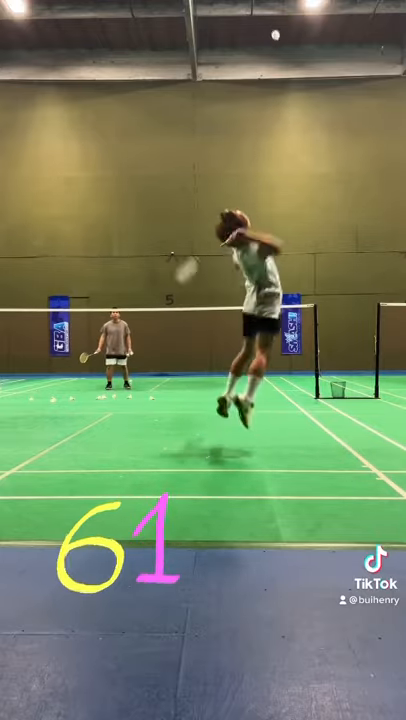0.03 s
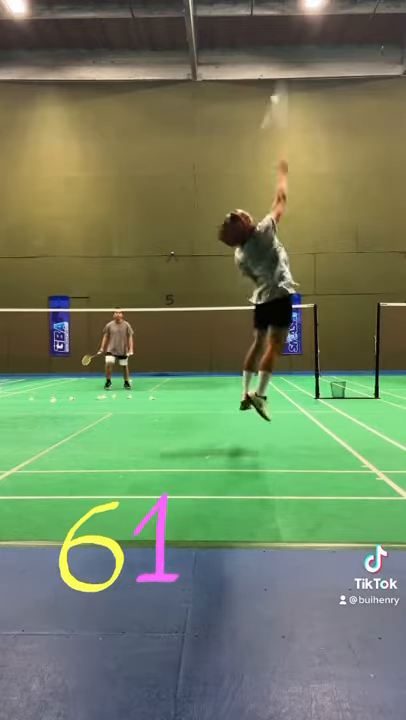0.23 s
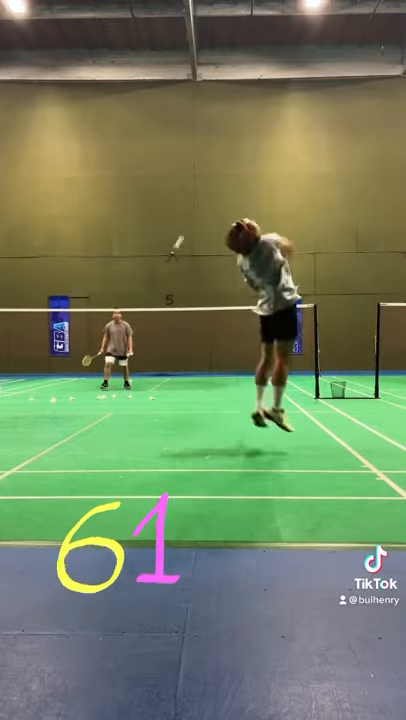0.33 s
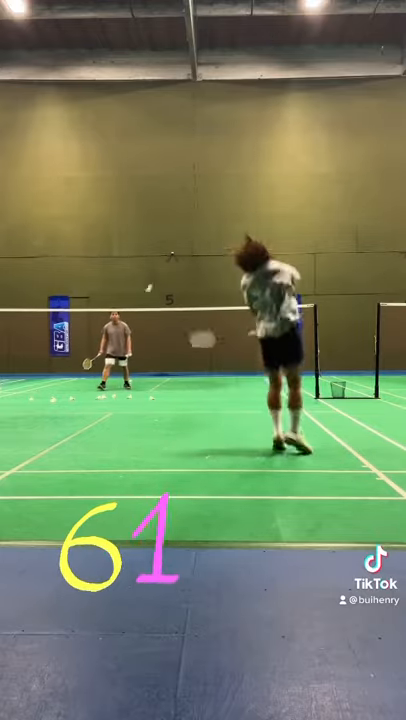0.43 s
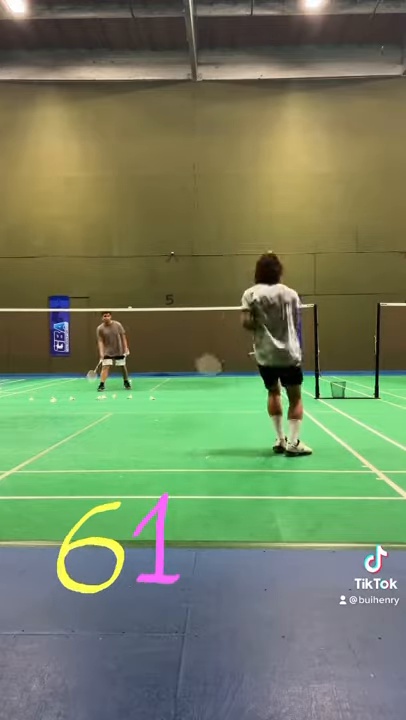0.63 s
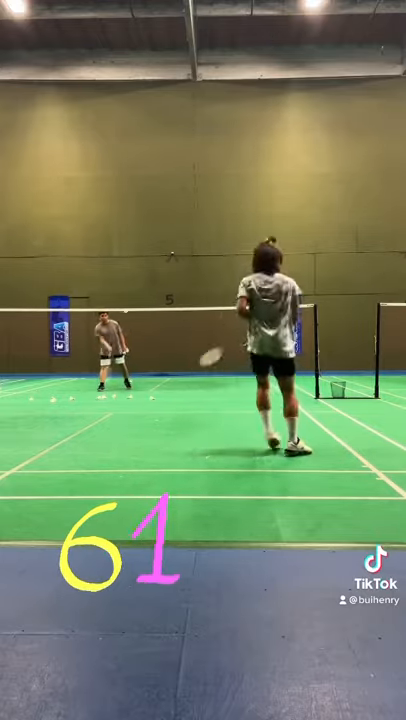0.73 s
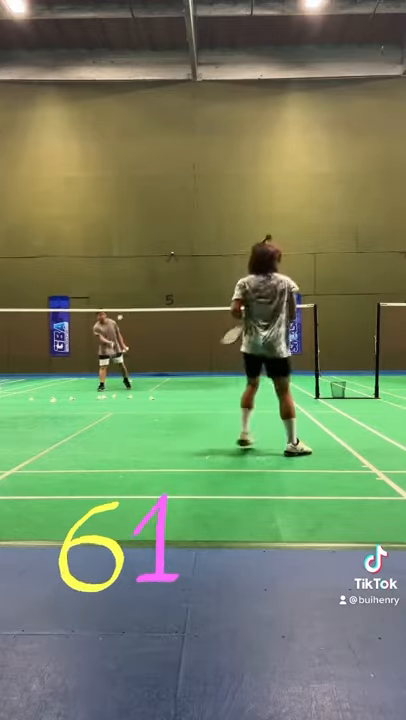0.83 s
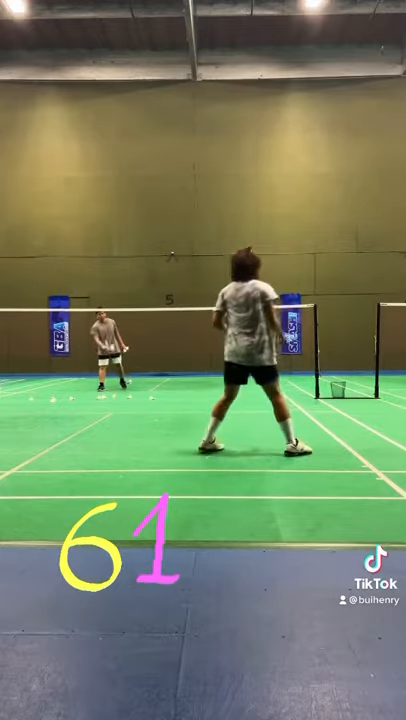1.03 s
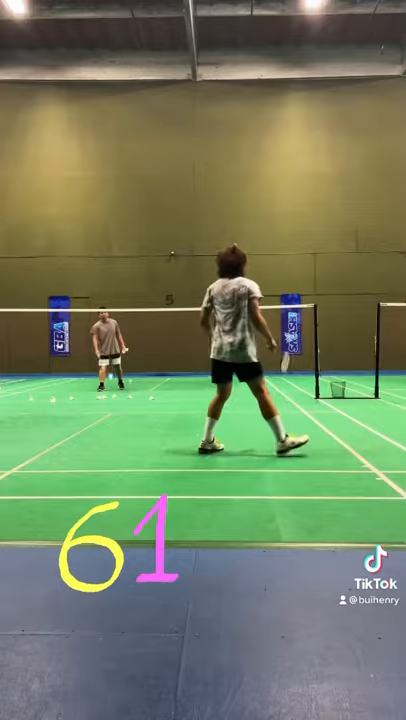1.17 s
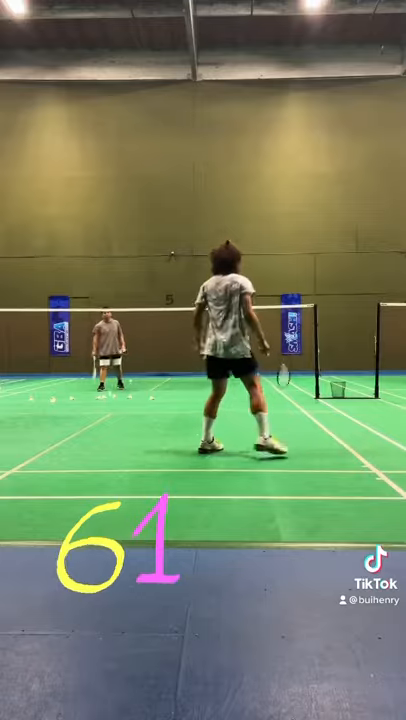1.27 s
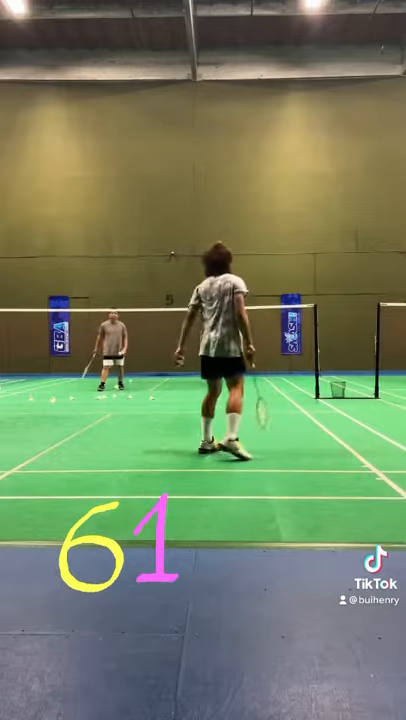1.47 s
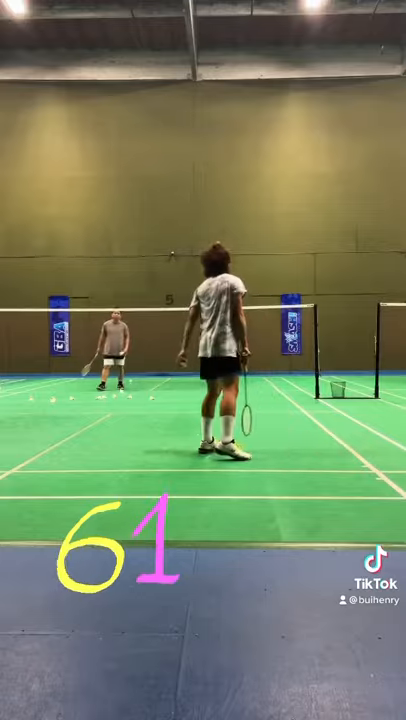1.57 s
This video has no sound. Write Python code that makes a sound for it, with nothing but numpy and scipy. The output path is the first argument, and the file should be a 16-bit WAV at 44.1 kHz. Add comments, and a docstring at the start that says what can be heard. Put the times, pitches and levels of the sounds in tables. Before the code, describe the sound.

A badminton racket swishes and cracks against a shuttlecock, echoing through a large sports hall. The player lands with shoe clicks and deep floor thuds, then shuffles lightly. A low ventilation rumble lies underneath, heard from behind the court.

```python
"""A racket swishes over a low ventilation rumble, then cracks against a shuttlecock: a badminton jump smash.
The large sports hall answers with slap echoes and a long tail while the follow-through hums through the air.
The player lands with sole clicks and deep thuds of the sprung floor, then shuffles and steps.
A small stereo microphone listens from behind the court."""
import sys
import numpy as np
from scipy import signal
from scipy.fft import rfft, irfft
from scipy.io import wavfile

SR = 44100
rng = np.random.default_rng(int(sys.argv[2]) if len(sys.argv) > 2 else 0)


def wrap_up_sound(samples):
    """Save the sound to the file named by the first command line argument, as 16-bit audio."""
    columns = np.atleast_2d(samples).T
    # keep every value between -1 and 1, then stretch to whole-number steps
    tamed = np.clip(columns, -1, 1)
    steps = np.round(tamed * 32767).astype(np.int16)
    wavfile.write(sys.argv[1], SR, steps)


N = 70560
T = np.arange(N) / SR
HZ = np.maximum(np.fft.rfftfreq(2 * N, 1 / SR), 1)


def from_db(db):
    """Decibels to gain."""
    return 10 ** (np.asarray(db) / 20)


def at_hz(points, hz, column=1):
    """Read a column of a table on a log-frequency axis."""
    points = np.array(points)
    return np.interp(np.log(hz), np.log(points[:, 0]), points[:, column])


def filtered(x, response):
    """Apply a frequency response."""
    return irfft(rfft(x, 2 * N) * response)[..., :N]


def convolve(x, response):
    """Pass a sound through an impulse response."""
    return filtered(x, rfft(response, 2 * N))


def low_cut(x, hz, order=2):
    """Small or slow motions radiate little bass."""
    return signal.sosfilt(signal.butter(order, hz, "high", fs=SR, output="sos"), x)


def noise(spectrum):
    """Coloured noise of rms 1; the spectrum sets only its shape."""
    x = filtered(rng.standard_normal(N), from_db(at_hz(spectrum, HZ)))
    return x / x.std()


def diffuse(make):
    """Two draws of a noise, as mid and side, give a partly alike left and right."""
    # likeness of diffuse sound in the two channels: freq_hz, likeness (0-1)
    likeness = [(80, 1), (200, 0.95), (520, 0.12), (1200, 0.3), (1800, 0.82), (3000, 0), (4800, 0.63),
                (6000, 0.75), (7600, 1), (9000, 1), (11000, 1)]
    alike = np.clip(at_hz(likeness, HZ), 0, .999)
    mid = filtered(make(), np.sqrt((1 + alike) / 2))
    side = filtered(make(), np.sqrt((1 - alike) / 2))
    return np.array([mid + side, mid - side])


def envelope(start_s, rise_s, hold_s, t60_s):
    """Curved attack, hold, exponential release."""
    t = T - start_s
    attack = np.clip(t / rise_s, 0, 1) ** 2
    return attack * from_db(-60 * np.maximum(t - rise_s - hold_s, 0) / t60_s)


def ring(start_s, modes, pitch=1, spread_s=0):
    """Struck modes: dying sines, set off at random moments within the spread."""
    out = np.zeros(N)
    for hz, db, t60 in modes:
        t = T - start_s - spread_s * rng.random()
        live = (t > 0) & (t < 2 * t60)
        out[live] += from_db(db - 60 * t[live] / t60) * np.sin(2 * np.pi * hz * pitch * t[live])
    return out


def ventilation():
    """The ventilation lays a steady, diffuse rumble under everything."""
    # colour of the rumble: freq_hz, level_db
    colour = [(25, -27), (45, -16), (75, 2), (130, -7.5), (230, -14), (340, -11), (600, -22.5),
              (1200, -32.5), (3000, -40.5), (6000, -50.5), (11000, -60.5), (14000, -84)]
    return from_db(-44.5) * diffuse(lambda: noise(colour))


def swish():
    """Air rushes through the strings as the racket gathers speed."""
    # colour of the rushing air: freq_hz, level_db
    colour = [(120, -16), (280, 3), (420, 10), (700, 1), (1100, 9.5), (1500, -2.5), (4000, -8), (6500, 4),
              (8500, 1), (10500, 5), (13000, -21)]
    return from_db(-37) * noise(colour) * envelope(start_s=.14, rise_s=.072, hold_s=0, t60_s=.33)


def smash(hit_s=.2102):
    """Three layers: cork and feathers crack on the strings, the racket pings, its head pops."""
    # colour of the crack: freq_hz, level_db
    colour = [(60, -15), (200, -30), (450, -14), (750, -1.5), (1100, 9.5), (1450, -11), (2100, -0.5),
              (3700, -4.5), (4800, -4), (6200, -2.5), (8000, -1), (10500, 2), (12000, -11.5),
              (14000, -23.5)]
    # modes of frame and strings: pitch_hz, level_db, t60_s
    racket_modes = [(481, -27, 0.061), (686, -18, 0.021), (790, -17.5, 0.028), (1140, -37, 0.11),
                    (1278, -28, 0.06), (1645, -25.5, 0.068), (1864, -36.5, 0.12), (2040, -19, 0.018),
                    (2326, -34.5, 0.072), (2664, -39.5, 0.14), (3214, -24.5, 0.037), (3713, -32.5, 0.055),
                    (5710, -21.5, 0.015), (6390, -20, 0.024), (6770, -18.5, 0.012)]
    pop_hz, pop_db, pop_t60_s = 328, -15, .044
    crack = from_db(-21.5) * noise(colour) * envelope(hit_s, rise_s=.00019, hold_s=.0066, t60_s=.018)
    # the modes are set off while the shuttlecock is on the strings
    ping = ring(hit_s + .000522, racket_modes, spread_s=.003)
    pop = -ring(hit_s + .004494, [(pop_hz, pop_db, pop_t60_s)])
    return low_cut(np.array([crack, ping, pop]), hz=204)


def hall(x, predelay_s=.011, build_s=.027):
    """A diffuse tail builds up and dies away, the treble first; a few resonances linger."""
    # colour and decay of the reverb: freq_hz, level_db, t60_s
    reverb = [(59, 12, 1.97), (156, 13, 2.6), (316, 4.5, 7.34), (566, 11, 5.53), (1160, 9, 3.88),
              (1410, 6.5, 4.5), (1840, 7.5, 3.6), (2160, 7.5, 2.93), (3930, 4.5, 2.84), (6160, 0.5, 1.67),
              (10300, 6.5, 0.79), (12000, 8.5, 0.47)]
    # resonances of the hall: pitch_hz, level_db, t60_s
    hall_modes = [(604.6, -62.5, 2.2), (1162, -61.5, 1.9), (1616, -60, 1.4), (1837, -60, 4.8),
                  (2236, -67, 2.2), (2420, -61.5, 2.2)]
    white = rfft(diffuse(lambda: rng.standard_normal(N)), 2 * N) / np.sqrt(SR)
    centres_hz = np.geomspace(60, 12500, 24)
    tail = ring(predelay_s, hall_modes)
    for hz, pick in zip(centres_hz, np.eye(len(centres_hz))):
        band = irfft(white * np.interp(np.log(HZ), np.log(centres_hz), pick))[:, :N]
        decay = envelope(predelay_s, rise_s=.00048, hold_s=0, t60_s=at_hz(reverb, hz, column=2))
        tail = tail + band * from_db(at_hz(reverb, hz)) * decay
    return convolve(x, tail * (1 - np.exp(-T / build_s)))


def follow_through():
    """Eddies shed by the slowing racket shaft give a falling, breathy hum."""
    start_s, start_hz, fall_hz_per_s, waver_hz = .24, 485, 850, 25
    pitch_hz = np.maximum(start_hz - fall_hz_per_s * (T - start_s), start_hz / 2)
    waver = filtered(rng.standard_normal(N), 1 / (1 + (HZ / waver_hz) ** 2))
    tone = (1 + .5 * waver / waver.std()) * np.sin(2 * np.pi * np.cumsum(pitch_hz) / SR)
    return from_db(-41) * tone * envelope(start_s, rise_s=.015, hold_s=.079, t60_s=.57)


def slap_echoes(x):
    """Walls and roof return smeared copies, each dulled by its surface."""
    # reflections: delay_s, level_db, smear_s, cutoff_hz
    echoes = [(0.032, -14, .002, 14000), (.079, -12, .003, 13000), (.089, -9, .007, 2300),
              (.113, -11.5, 0.0059, 5000), (.139, -8, .006, 1300)]
    response = 0
    for delay_s, db, smear_s, cutoff_hz in echoes:
        scatter = rng.standard_normal(N) * (T > delay_s) * np.exp(-abs(T - delay_s) / smear_s)
        scatter = scatter / np.linalg.norm(scatter) + 1e-18
        dull = signal.butter(2, cutoff_hz, fs=SR, output="sos")
        response += from_db(db) * signal.sosfilt(dull, scatter)
    return convolve(x, response)


def sole_clicks():
    """Soles snap and knock on the mat three times; a faint, brighter slap echo follows the last."""
    # three sole clicks, then the echo: start_s, level_db, snap_db, pitch_ratio
    cues = [(0.3876, -16, -7, 1.07), (0.407, -18, 2.5, .95), (1.2436, -17.5, -15, 0.956),
            (1.2755, -34.5, -13, 2.03)]
    # modes of the sole: pitch_hz, level_db, t60_s
    sole_modes = [(642, -12, 0.049), (1070, -9.5, 0.027), (1390, -4.5, .018), (1657, -16.5, 0.038),
                  (3680, -21, 0.023), (4870, -25, 0.013)]
    # colour of the snap: freq_hz, level_db
    colour = [(500, 11.5), (2000, 2.5), (3300, -9.5), (4600, 1.5), (6200, 3), (8000, -13), (10500, -0.5),
              (12000, -16), (13500, -38.5)]
    snap_noise = noise(colour)
    clicks = 0
    for start_s, db, snap_db, pitch in cues:
        knock = ring(start_s, sole_modes, pitch, spread_s=.00051)
        snap = snap_noise * envelope(start_s, rise_s=.0002, hold_s=.00025, t60_s=.007)
        clicks += from_db(db) * (knock + from_db(snap_db) * snap)
    return low_cut(clicks, hz=284)


def floor_thuds():
    """The player's weight sets the floor booming; a longer contact is duller."""
    # footfalls: start_s, level_db, contact_s
    footfalls = [(0.393, -23.5, 0.00088), (0.4266, -14, 0.0031), (0.4457, -9, .0047),
                 (0.4603, -15.5, 0.0055), (0.5059, -13.5, 0.01074), (0.5566, -18.5, 0.0063),
                 (0.6652, -15, 0.0093), (0.7049, -15.5, 0.011), (0.8999, -30.5, 0.0039),
                 (1.0104, -29.5, 0.0036), (1.276, -33.5, 0.0021), (1.3382, -37, 0.0054)]
    # modes of the sprung floor: pitch_hz, level_db, t60_s
    floor_modes = [(63.9, -15.5, 0.52), (86.8, -10.5, 0.21), (109.7, -11.5, 0.21), (141.7, -5.5, 0.15),
                   (178.5, -1.5, 0.25), (227.8, 1.5, 0.1), (275.9, -2.5, 0.16)]
    boom = 0
    for start_s, db, contact_s in footfalls:
        push = np.sin(np.pi * np.clip(T / contact_s, 0, 1)) ** 2
        boom += from_db(db) * convolve(ring(start_s, floor_modes), push / push.sum())
    return low_cut(boom, hz=60.5, order=6)


def scuffs():
    """Soles slide on the mat with a rub and a hiss."""
    # slides: start_s, hold_s, level_db, hiss_db
    slides = [(0.422, 0.026, -34.5, -20), (0.893, 0.048, -50, -3.5), (1.273, 0.023, -43, -7.5),
              (1.325, 0.085, -52, -4.5)]
    # body of a scuff: freq_hz, level_db
    rub_colour = [(150, -22), (350, 12.5), (850, 0.5), (1600, -3.5), (2700, -4), (5000, -20), (10000, -52)]
    # top end of a scuff: freq_hz, level_db
    hiss_colour = [(2000, 3.5), (4500, 1.5), (6800, 4), (8500, 3), (10500, 4), (12500, -22.5)]
    rub, hiss = noise(rub_colour), noise(hiss_colour)
    shuffle = 0
    for start_s, hold_s, db, hiss_db in slides:
        stroke = envelope(start_s, rise_s=.0076, hold_s=hold_s, t60_s=.11)
        shuffle += from_db(db) * (rub + from_db(hiss_db) * hiss) * stroke
    return shuffle


def squeak(peak_s=.946, pitch_hz=2430, width_s=.007):
    """A sole grips with a tiny squeak."""
    return from_db(-44) * np.sin(2 * np.pi * pitch_hz * T) * np.exp(-((T - peak_s) / width_s) ** 2)


def scene():
    """Racket and footwork, their echoes and reverb, over the ventilation."""
    crack, ping, pop = smash()
    clicks = sole_clicks()
    # reverb sends: sound, send_db
    sends = [(swish(), 9), (crack, 3), (ping, -4), (pop, -1),
             (clicks, -9.5), (floor_thuds(), -6.5), (scuffs(), 2.5)]
    direct = sum(sound for sound, _ in sends) + follow_through() + squeak()
    # sounds made at floor level reach the walls more weakly
    slaps = slap_echoes(crack + ping + from_db(-8.5) * clicks)
    tail = hall(sum(from_db(send_db) * sound for sound, send_db in sends))
    return direct + slaps + tail + ventilation()


def record(dry, cutoff_hz=14900):
    """The microphone pair sets left and right apart in level and phase; the top is cut steeply."""
    # stereo balance: freq_hz, left_minus_right_db
    balance = [(110, 1), (200, -0.5), (370, 10), (680, 0.5), (1260, 2), (3000, 0)]
    # phase between the channels: freq_hz, left_lead_rad
    phase = [(80, 0), (340, .5), (620, -1.8), (1800, .2), (3100, -1), (4300, .5), (4850, 3.1), (5500, 6),
             (6200, 6.4), (9000, 9.4), (12000, 12.5)]
    lean = from_db(at_hz(balance, HZ) / 2)
    lead = np.interp(HZ, *np.transpose(phase))
    pair = filtered(dry, np.array([lean, np.exp(-1j * lead) / lean]))
    return signal.sosfilt(signal.cheby2(12, 70, cutoff_hz, fs=SR, output="sos"), pair)


dry = scene()
out = record(dry)
wrap_up_sound(out)
```